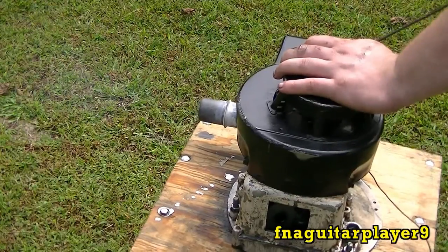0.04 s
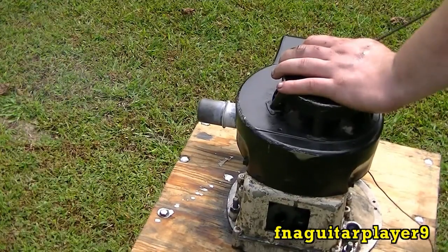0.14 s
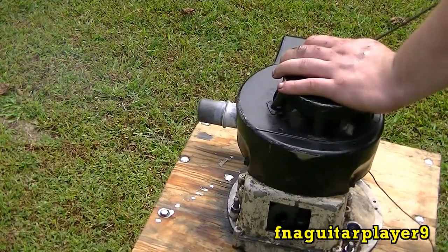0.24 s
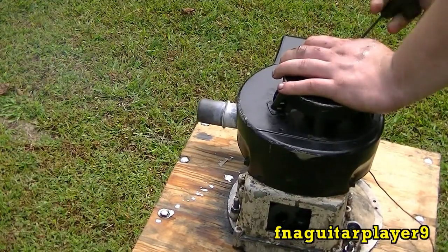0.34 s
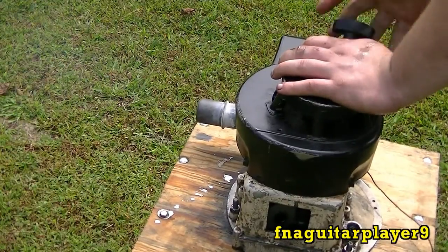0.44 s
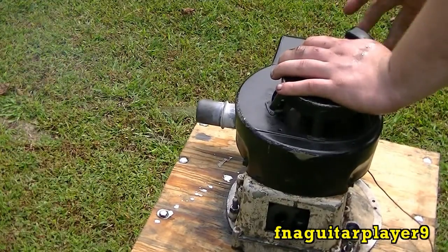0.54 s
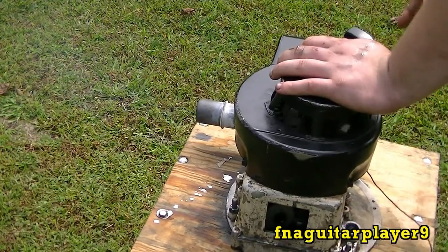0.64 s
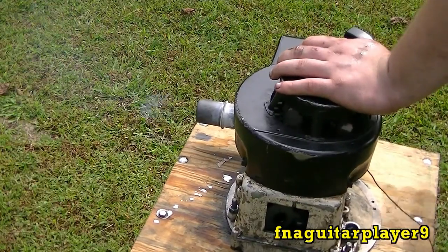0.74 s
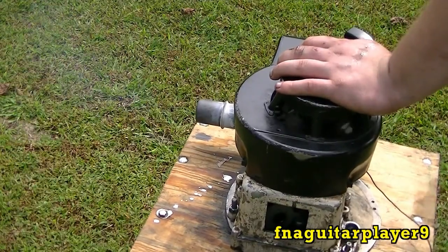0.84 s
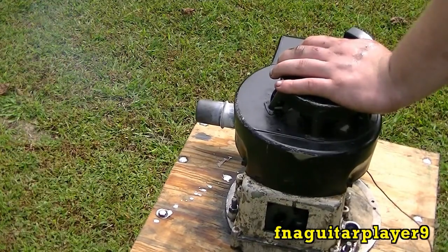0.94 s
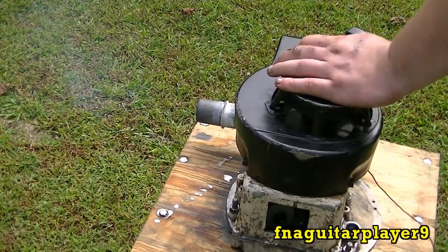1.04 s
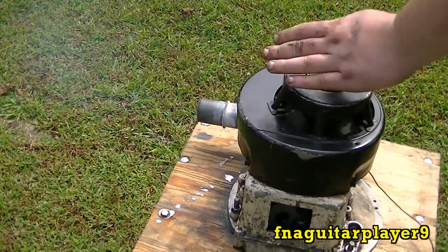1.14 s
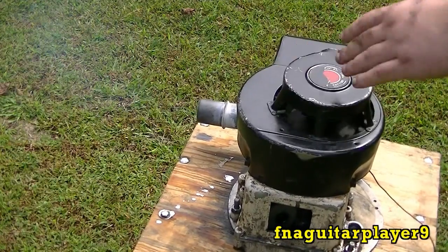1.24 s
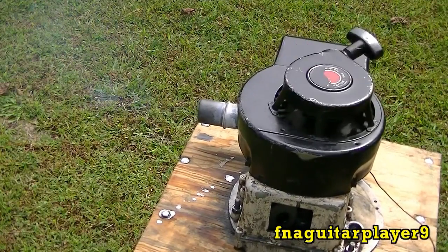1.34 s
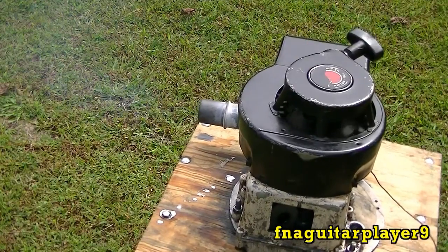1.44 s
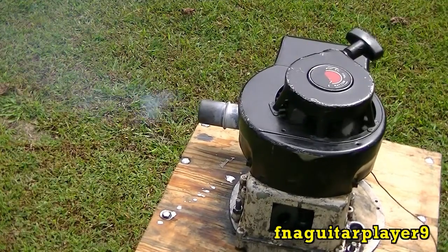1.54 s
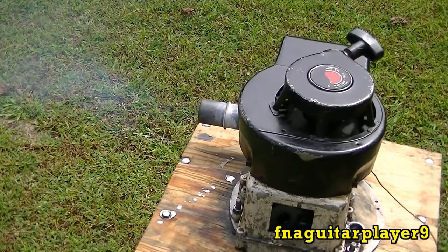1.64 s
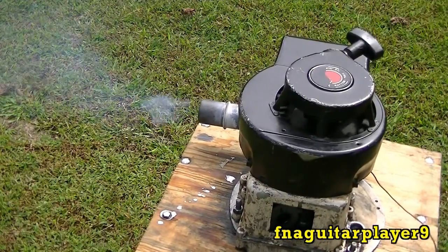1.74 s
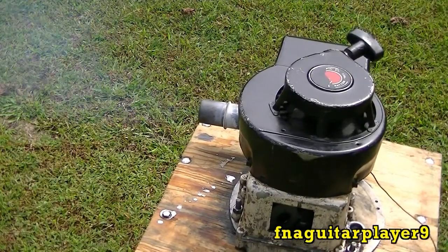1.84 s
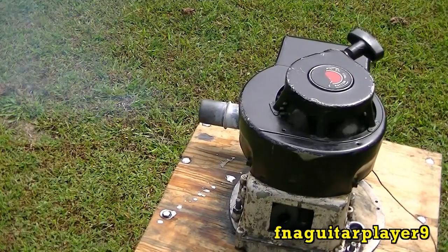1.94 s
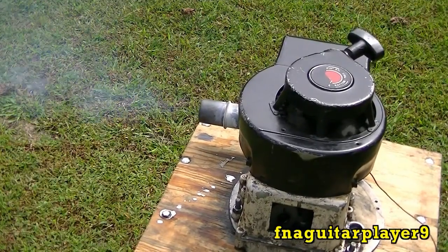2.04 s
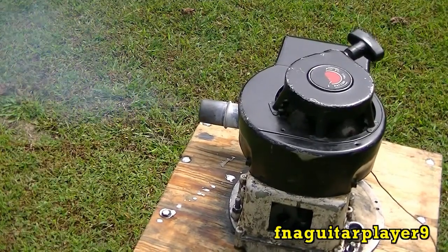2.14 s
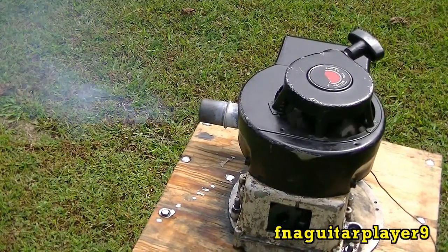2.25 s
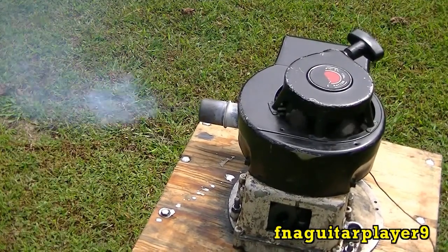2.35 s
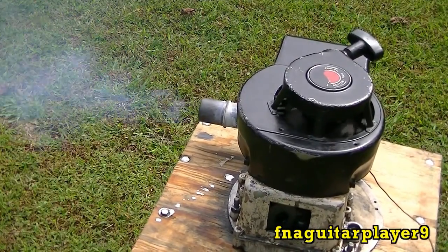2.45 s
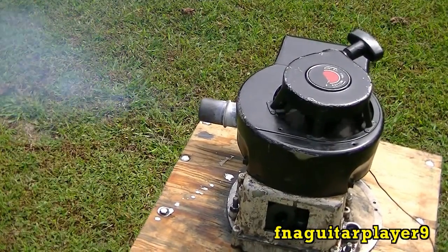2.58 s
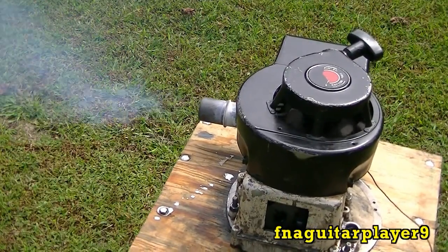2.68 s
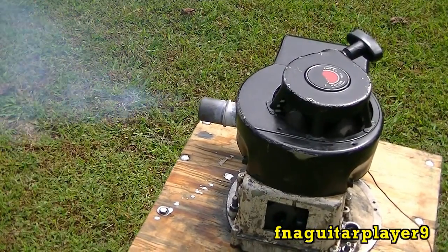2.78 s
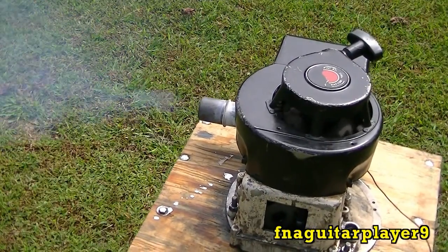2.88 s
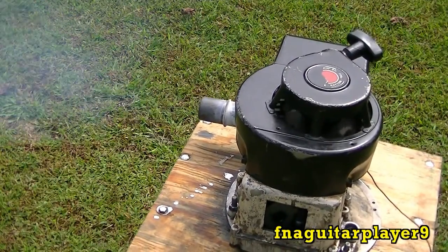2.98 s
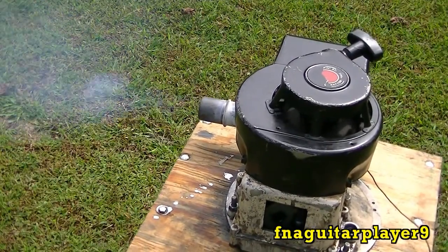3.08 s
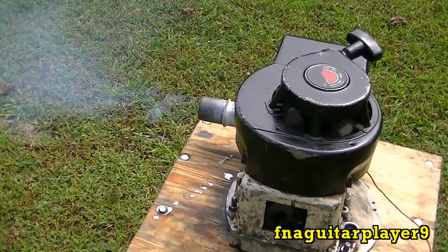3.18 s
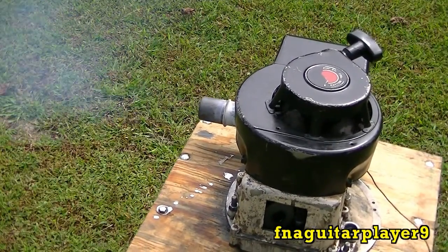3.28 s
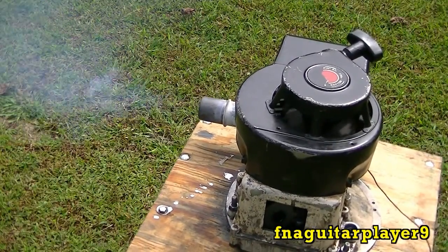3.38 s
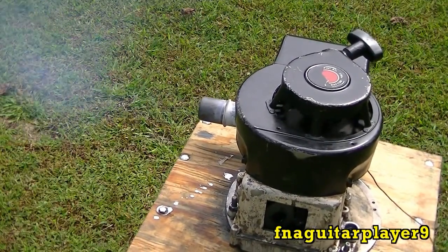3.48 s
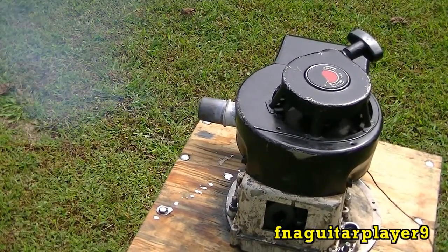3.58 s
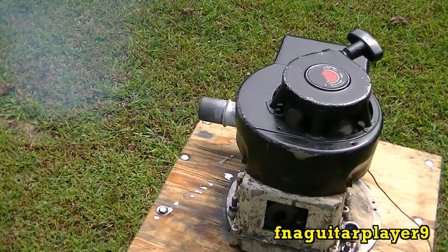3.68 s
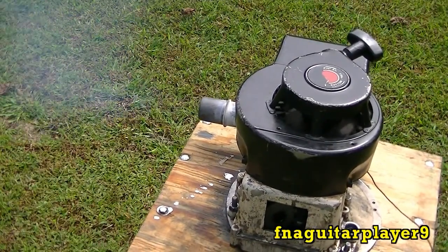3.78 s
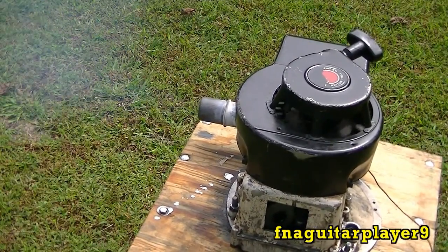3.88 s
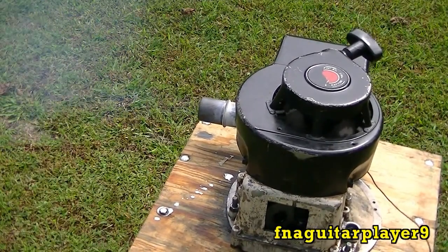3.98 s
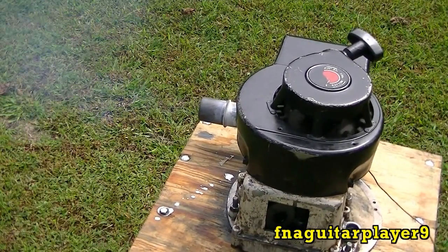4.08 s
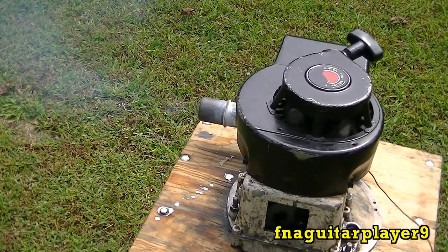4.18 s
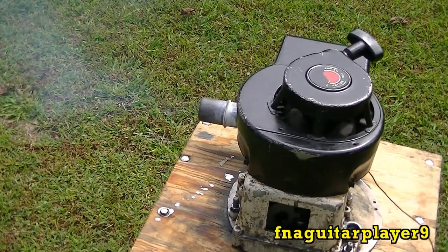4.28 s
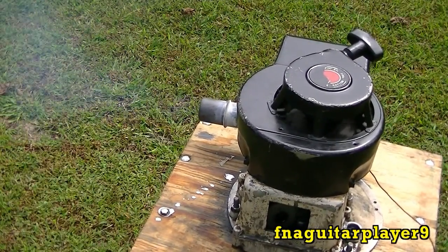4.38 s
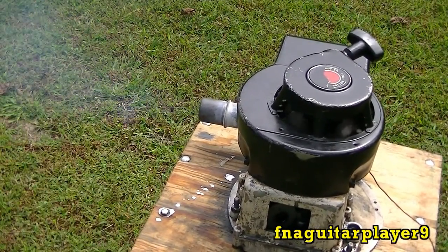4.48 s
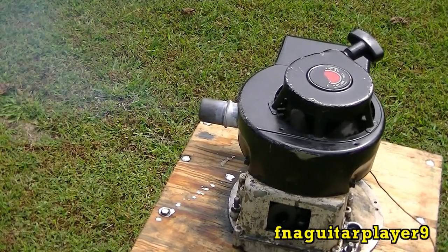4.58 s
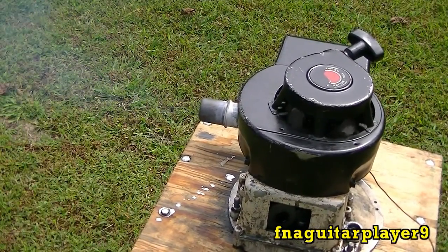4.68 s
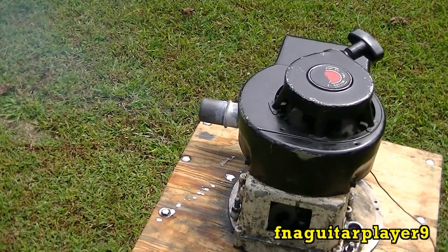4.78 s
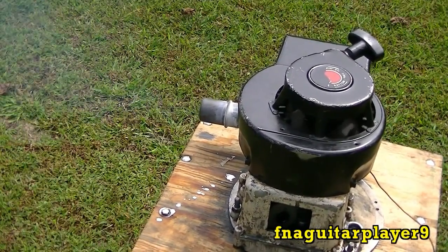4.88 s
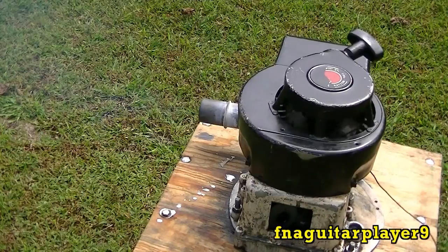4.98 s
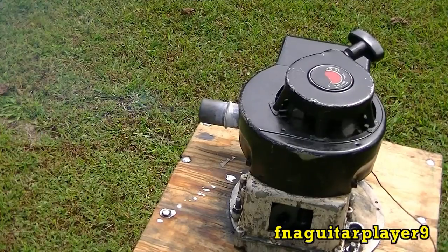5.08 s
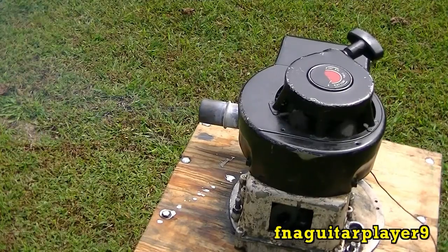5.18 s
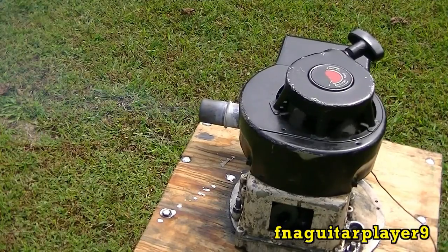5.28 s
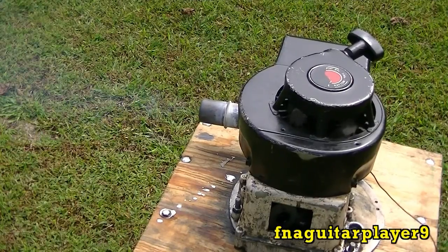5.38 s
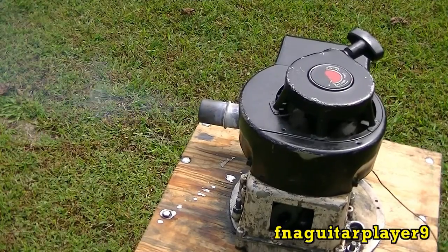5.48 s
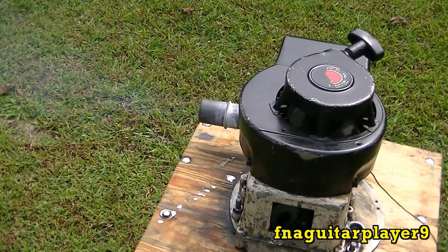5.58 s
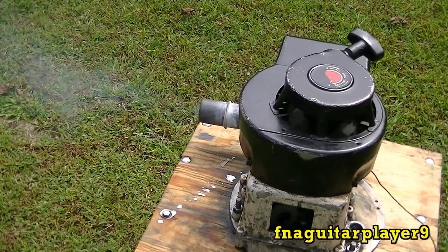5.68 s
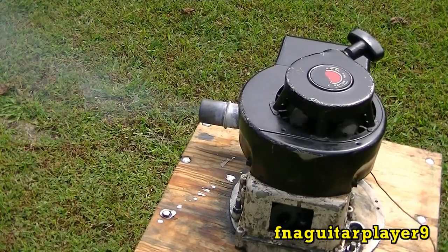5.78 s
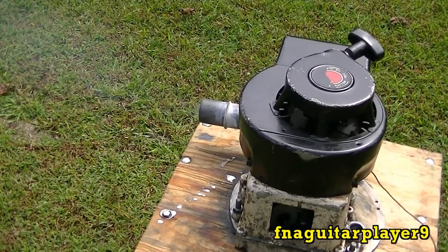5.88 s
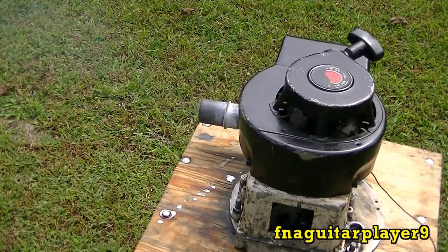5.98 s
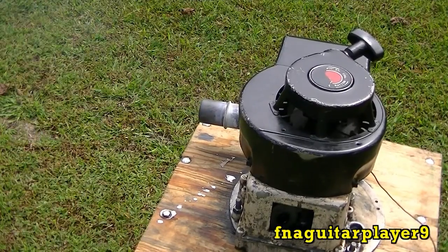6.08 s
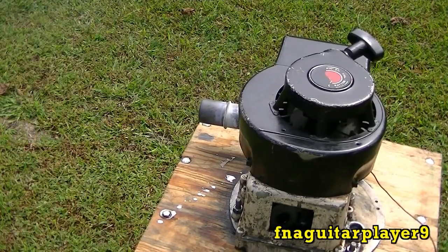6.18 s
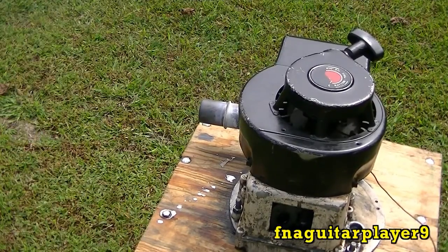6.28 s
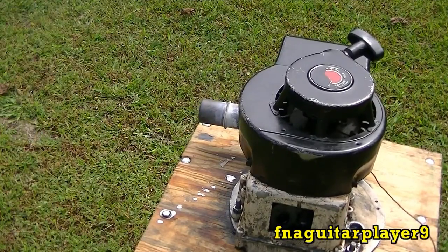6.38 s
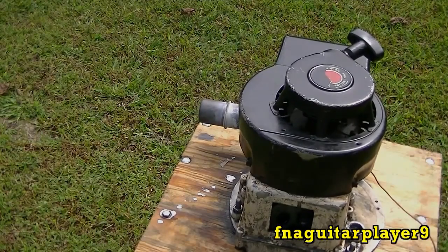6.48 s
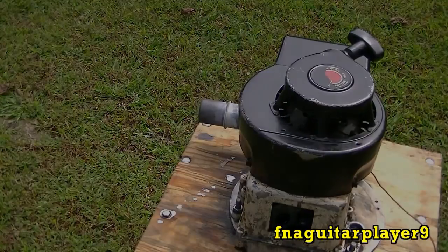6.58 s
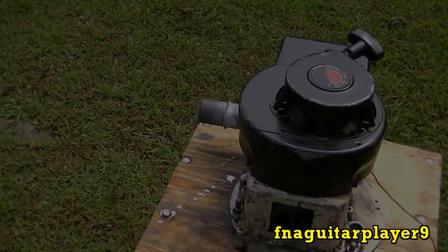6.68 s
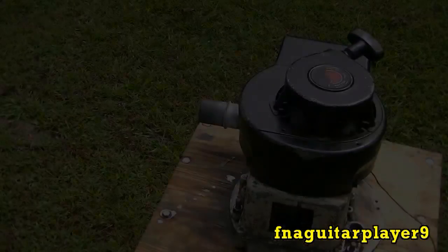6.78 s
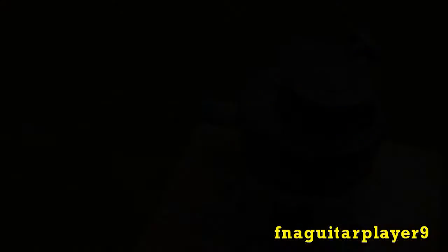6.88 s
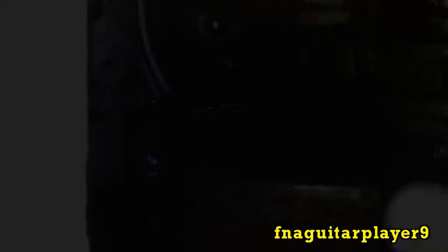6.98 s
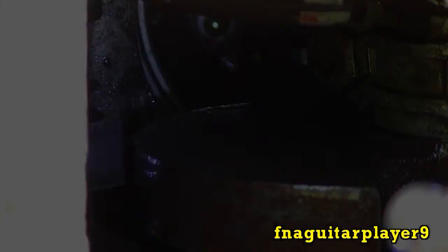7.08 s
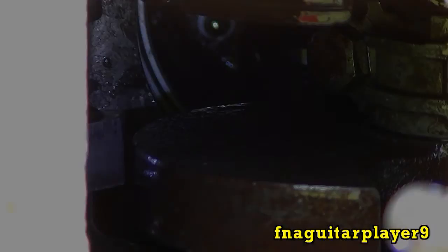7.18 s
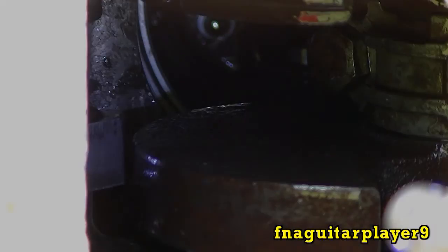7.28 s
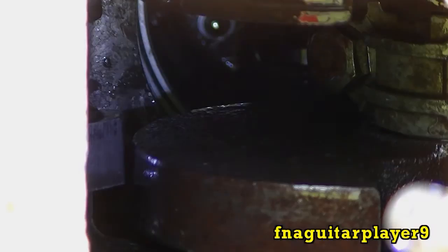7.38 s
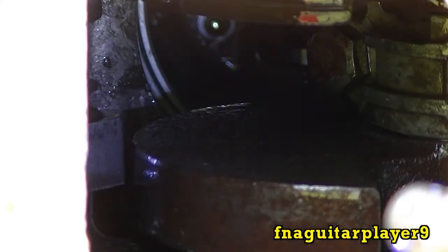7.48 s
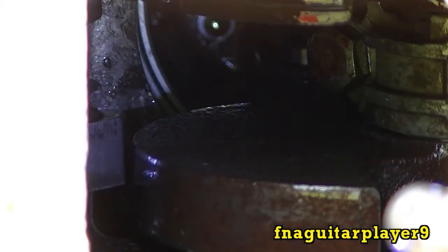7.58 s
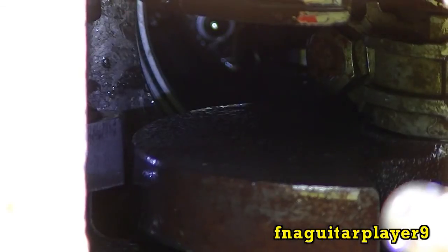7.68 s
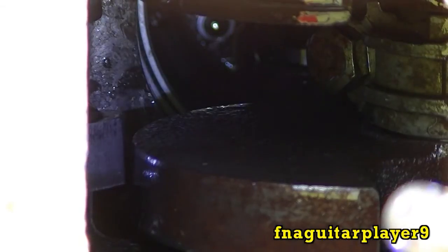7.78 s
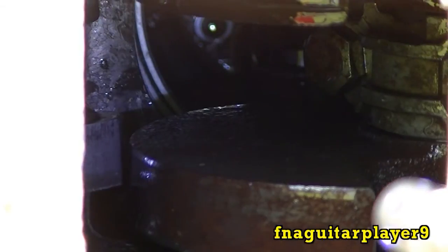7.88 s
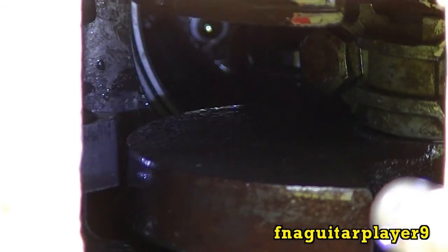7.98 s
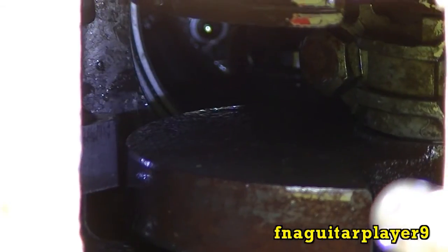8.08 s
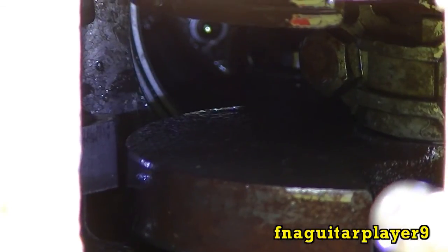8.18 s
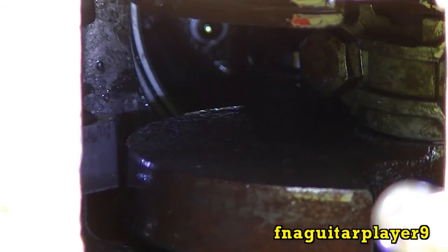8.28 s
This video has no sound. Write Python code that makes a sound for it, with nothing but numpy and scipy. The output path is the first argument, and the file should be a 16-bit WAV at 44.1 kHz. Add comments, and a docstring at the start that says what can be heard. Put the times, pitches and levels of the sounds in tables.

```python
"""A small four-stroke single-cylinder engine on a board on a lawn speeds up, slows, misfires and stops.
Gas pulses make its exhaust thump and its short pipe ring; a leaking valve squeaks as narrow noise.
Bursts of grit and ringing modes make the clatter, and the last clanks as the crank rocks to rest.
Insects (coloured noise and short notes) sing behind; they fade almost away and come back with a hum.
Near the end a hand bumps (low ringing) and scuffs (puffs of grit) something close by."""
import sys
import numpy as np
from scipy import signal
from scipy.fft import rfft, irfft
from scipy.io import wavfile

SR = 44100
rng = np.random.default_rng(int(sys.argv[2]) if len(sys.argv) > 2 else 0)


def master(y):
    """Save y as 16-bit WAV."""
    cut = np.clip(np.atleast_2d(y).T, -1, 1)
    pcm = np.round(cut * 32767)  # scale
    wavfile.write(sys.argv[1], SR, pcm.astype(np.int16))


N = 367794

# Levels are relative: each layer adds its own overall level. "Per speed" means per cycle per second.

# how fast the crank runs: (t/s, four-stroke cycles per second)
CRANK_SPEED = [(0.0, 9.981), (0.5, 10.532), (1.0, 11.554), (1.5, 13.683), (2.0, 16.597), (2.4, 18.177),
               (2.8, 18.291), (3.2, 16.566), (3.6, 15.14), (4.0, 13.453), (4.4, 11.865), (4.75, 10.555),
               (4.95, 9.133), (5.1, 8.842), (5.25, 8.913), (5.4, 7.184), (5.55, 7.547), (5.66, 8.82)]
MID_SPEED = 14  # cycles per s at which levels with a speed slope hold as written
START_CYCLE = -.2546  # crank position at the start, in cycles
STOP_S, RATTLE_STOP_S = 5.62, 5.675

# weak pipe pulses of the other strokes: (place in cycle/0-1, level/dB)
PIPE_STIRS = [(0.517, -20), (0.701, -23.5)]
OPENING, CLOSING = -0.017, .285  # places in the cycle of the exhaust valve's two pulses
# tones at which the exhaust pipe rings: (f/Hz, level/dB, time to fall 60 dB/s)
PIPE_MODES = [(326.8, -7.5, 0.085), (348.4, -2.5, 0.17), (389.4, -1.5, 0.053), (454, -18, 0.067),
              (531, -13, 0.075)]
PIPE_DB = -5.5  # added to every pipe mode
PIPE_BLOOM_DB, PIPE_BLOOM_WIDTH_HZ = 3, 58  # the lowest mode goes on building while gas flows
OPENING_DB, CLOSING_DB, CLOSING_DB_PER_SPEED = -10, -11.5, -0.1  # pipe pulses at full throttle
# above this speed the throttle closes, late
GOVERNOR_SPEED, GOVERNOR_LAG_S = 12.65, 0.27
OPENING_THROTTLED_DB_PER_SPEED = -3.5
CLOSING_THROTTLED_DB_PER_SPEED, STIR_THROTTLED_DB_PER_SPEED = -1, -1
THUMP_HZ, THUMP_MS = 134.2, 3.67  # the puff is about one swing of pressure
THUMP_DB, THUMP_DB_PER_SPEED = -24, -0.66
# cycles that fire unevenly as the engine dies:
# (t/s, change of thump and squeak/dB, of opening pulse/dB, of closing pulse/dB)
UNEVEN_FIRINGS = [(4.895, -11, -11, 2.5), (5.004, -0.5, 3, -1.5), (5.229, 0, 4.5, -1),
                  (5.347, -12, -11.5, 1), (5.483, -5.5, 3, -5), (5.613, -10, -6.5, -6)]

WHISTLE_PLACE, WHISTLE_DB, WHISTLE_DB_PER_SPEED = .93, -27.5, -1.4
WHISTLE_HZ, WHISTLE_WIDTH_HZ = 10590, 1400
WHISTLE_SPREAD_DB, WHISTLE_MS = 2.5, 1.7

# thuds near each end of the piston's travel: (place in cycle, level/dB)
PISTON_THUDS = [(0.283, 10.5), (0.539, 4.5), (.797, 4), (1.052, -1.5)]
STROKE_DB_PER_SPEED = 2.5
# range in which the thuds are heard: (low f/Hz, high f/Hz)
STROKE_BAND_HZ = [259, 620]

# touching parts in each cycle: (place in cycle/0-1, decay/ms, level change per speed/dB,
# level into board/dB, into casing/dB, into fins/dB, into air jet/dB)
CONTACTS = [(.0, 7.9, -0.78, -7.5, -2, -2.5, -18), (.145, 8.7, -0.66, -1.5, -5.5, 1, -13.5),
            (.185, 1.8, 0.57, 9, 4.5, -1, 2.5), (.22, 3.24, -0.035, -9.5, 0.5, 2.5, 7),
            (.30, 0.2, 0.039, 8.5, 2, -14.5, -13), (.455, 5.2, -0.93, 1.5, -4, -7.5, -3.5),
            (.54, 2.63, -1.5, -14, -25.5, 0, -8), (.665, 3.24, -0.65, 0, -6.5, -21.5, -6),
            (.73, 6.3, 0.21, 0, -2.5, 2.5, -2), (.81, 10, -0.89, -3, -2, -16, -14.5),
            (.9, 3.34, 0.073, -8, -4, 3.5, 6)]
# share of each contact's grit power that repeats every cycle: one column per body [0-1]
REPEAT_SHARE = [1, 0.4, 0.053, 0.22]
# loose parts between contacts: one column per body, in the same order [level/dB]
RATTLE_DB = [-11.5, -9, -12.5, -21]
# part of the cycle over which the loose parts settle: (start/0-1, end/0-1)
LULL_PLACES = [0.41, 0.57]
LULL_DB = -4.5
# edges of the four bands of board, casing, fins and air jet: [f/Hz]
BODY_EDGES_HZ = [500, 1400, 3500, 6700, 12300]
# dense small modes beside the clear ones: one column per body [level/dB]
BODY_BROAD_DB = [1, 1.5, -20, -2.5]
# clear modes of the bodies: (f/Hz, width/Hz, level/dB)
BODY_MODES = [(899, 122, -5), (1265, 62, 4), (1616, 318, -1), (2170, 64, 4), (2467, 95, -4),
              (3124, 48, -2.5), (4250, 300, -2), (4770, 140, 2.5), (5540, 470, 0.5), (7750, 350, -7.5),
              (8700, 300, -17.5)]
# last clanks as the crank rocks to rest: (t/s, overall level/dB,
# board level/dB, casing level/dB, fins level/dB, air jet level/dB, pipe pulse level/dB)
CLANKS = [(5.609, -12.5, 16.5, -22, -19, -21, -5.5), (5.623, -9, -8, 7, -1, 3, -29),
          (5.677, -2.5, -8, 0.5, 2.5, -5, -29), (5.695, -2, 1.5, -2.5, -8, -6, -21),
          (5.761, -5, -2, -0.5, -2, -12, -18), (5.782, 2, -3, -2.5, 3, 0.5, -40),
          (5.826, -4, -6, 3.5, 0, -1, -24.5), (5.88, -13, 3, -9, -10, -4, -20),
          (5.894, -9, 5, 7.5, -12, -19, -13.5)]
CLATTER_DB, CLATTER_DB_PER_SPEED = -19, 0.02
COAST_FROM_S, COAST_DB_PER_S = 5.61, -240  # the clatter sinks as the crank stalls

# solid knocks: (place in cycle/0-1, level/dB, level change per speed/dB, name of part struck)
KNOCKS = [(.195, 3, -0.1, "head"), (.225, 4.5, -0.56, "head"), (.31, -2, 1.18, "cover"),
          (0.461, -1.5, -0.3, "cover"), (.67, -5.5, 1.05, "valve"), (.715, -2.5, 0.45, "valve"),
          (.76, -2.5, -1, "valve")]
# ringing tones of each struck part, by name: (f/Hz, level/dB, time to fall 60 dB/s)
PART_MODES = {"head": [(812, -3, 0.034), (1750, -0.5, 0.033), (2432, -9.5, 0.06), (3278, -5, 0.019),
              (4866, -25.5, 0.024), (5517, 2, 0.012)], "cover": [(956.5, 0.5, 0.048), (1161, -11, 0.074),
              (2196, -7, 0.022), (3107, -14, 0.067)], "valve": [(1120, -11.5, 0.22), (1387, -7.5, 0.074),
              (1592, -2, 0.037), (1800, -1.5, 0.041), (2170, 0, 0.03), (2404, -9, 0.027),
              (3000, -5, 0.043)]}

# colour of the open air's noise: (f/Hz, level per Hz/dB)
AIR_SPECTRUM = [(24, -45), (40, -13), (90, -2), (190, -2), (422, -10), (2570, -18.5), (2840, -18),
                (4130, -21.5), (6820, -9.5), (8990, -25), (16000, -34)]
# colour of the insect chorus: (f/Hz, level per Hz/dB)
CHORUS_SPECTRUM = [(4600, -55.5), (5300, -17.5), (6100, 0.5), (7200, -5.5), (8200, -10), (8450, -34),
                   (9000, -41)]
# open air compared with chorus: before and after the quietest moment [level/dB]
AIR_OVER_CHORUS_DB = [0, 4.5]
# whole background: before and after the quietest moment [level/dB]
BACKGROUND_DB = [-49.5, -52]
QUIETEST_S, FADE_OUT_S, FADE_IN_S = 6.94, .52, .66
HUM_HZ, HUM_DB, HUM_FROM_S = 535, -9, 6.95  # a distant machine hums

# one cricket's repeating phrase: (t into phrase/s, f/Hz, level/dB)
PHRASE = [(.005, 2850, -9), (.035, 2850, -8), (.02, 3200, -12)]
PHRASE_S, PHRASE_END_S = .05, 6.93
# trills of a second cricket: (t/s, level/dB)
TRILLS = [(6.1, -5), (6.42, -5)]
# loudness of the notes within one trill: one column per note [level/dB]
TRILL_SHAPE_DB = [-9, 0, -1, -7]
TRILL_HZ, TRILL_STEP_S = 5000, .04

# bumps of the hand: (t/s, level/dB, f/Hz, time to fall 60 dB/s)
BUMPS = [(7.579, -27.5, 169, 0.11), (7.786, -20.5, 171.5, 0.13), (7.83, -25, 153, 0.074),
         (7.961, -26.5, 128, 0.041)]
# scuffs of the hand: (t/s, level/dB, centre f/Hz, length/ms)
SCUFFS = [(7.574, -31, 872, 3.2), (7.712, -30, 937, 3.1), (7.756, -28, 2260, 5.6), (7.782, -21, 507, 7),
          (7.9, -39.5, 2170, 13), (7.932, -36, 1000, 8.4), (7.944, -33, 560, 8.4),
          (7.954, -34.5, 2590, 3.8), (8.307, -21.5, 1270, 5.6), (8.317, -21.5, 886, 6.4),
          (8.319, -31, 1310, 8.2)]

WIDTH_DB = -26
# range that differs between left and right: (low f/Hz, high f/Hz)
WIDTH_BAND_HZ = [2000, 11000]
CUTOFF_HZ = 16400


def from_db(db):
    """Turn decibels into gain."""
    return 10 ** (np.asarray(db) / 20)


def rms_one(x):
    """Scale to an average strength (rms) of 1."""
    return x / np.sqrt(np.mean(x ** 2) + 1e-20)


def clicks(times, gains):
    """Put one single-sample click at each time."""
    out = np.zeros(N)
    at = np.clip(np.round(np.asarray(times) * SR).astype(int), 0, N - 1)
    np.add.at(out, at, gains)
    return out + 1e-18  # keeps the filters away from extremely small numbers


def ring(x, hz, t60):
    """A click sets off a dying sine, as a struck object does; t60 is the time to fall 60 dB."""
    r, w = from_db(-60 / (t60 * SR)), 2 * np.pi * hz / SR
    return signal.lfilter([0, np.sin(w)], [1, -2 * r * np.cos(w), r * r], x)


def resonance(x, hz, width_hz):
    """Favour sound near one frequency, with gain 1 at the top."""
    r = np.exp(-np.pi * width_hz / SR)
    top = np.array([1, 0, -1]) * (1 - r * r) / 2
    return signal.lfilter(top, [1, -2 * r * np.cos(2 * np.pi * hz / SR), r * r], x)


def band(x, low_hz, high_hz):
    """Keep one range of frequencies, with smooth edges."""
    return signal.sosfilt(signal.butter(2, [low_hz, high_hz], "band", fs=SR, output="sos"), x)


def swell(x, ms):
    """Each click becomes a quick rise and an exponential fall of height 1."""
    r = np.exp(-1000 / (ms * SR))
    return signal.lfilter([np.e * (1 - r)], [1, -2 * r, r * r], x)


def grit(spiky_db):
    """Noise whose grains differ in size, like rough surfaces rubbing."""
    grain_db = spiky_db * np.minimum(rng.exponential(1, N), 4)
    return rms_one(rng.standard_normal(N) * from_db(grain_db))


def coloured(spectrum):
    """Slightly grainy noise with a given spectrum."""
    hz = np.fft.rfftfreq(N, 1 / SR) + 1
    points_hz, points_db = np.transpose(spectrum)
    colour_db = np.interp(np.log(hz), np.log(points_hz), points_db)
    return rms_one(irfft(rfft(grit(0.86)) * from_db(colour_db), N))


def bursts(times, hz, ms):
    """A tone under a bell-shaped envelope, and the samples it covers for each time."""
    reach = np.arange(-600, 600)
    span = np.clip((np.asarray(times) * SR).astype(int)[:, None] + reach, 0, N - 1)
    bell = np.exp(-.5 * (reach / (ms * SR / 1000)) ** 2)
    return span, bell * np.sin(2 * np.pi * hz * reach / SR)


def speed_above_mid(lag_s=0):
    """Crank cycles per second above mid speed, as they were lag_s ago."""
    s, speed = np.transpose(CRANK_SPEED)
    return np.interp(np.arange(N) / SR - lag_s, s, speed) - MID_SPEED


def crank_position():
    """Cycles turned so far: speed added up over time."""
    return START_CYCLE + np.cumsum(speed_above_mid() + MID_SPEED) / SR


def moments(place):
    """Times and sample indices at which the crank passes a place in its cycle."""
    wanted = np.arange(-1, 80) + place
    times = np.interp(wanted, crank_position(), np.arange(N) / SR, left=-1)
    times = times[(times >= 0) & (times < STOP_S)]
    return times, (times * SR).astype(int)


def firing_change(times, order):
    """Uneven firing changes the nearest cycle's pulse, in dB; order picks the table column."""
    change = np.zeros(len(times))
    for s, *change_db in UNEVEN_FIRINGS:
        change[np.argmin(abs(times - s))] = change_db[order]
    return change


def crickets():
    """Short clean notes: one cricket repeats its phrase, a second one trills."""
    starts = np.arange(0, PHRASE_END_S, PHRASE_S)
    notes = [(start + s, hz, db) for start in starts for s, hz, db in PHRASE]
    for s, level_db in TRILLS:
        for k, step_db in enumerate(TRILL_SHAPE_DB):
            notes.append((s + k * TRILL_STEP_S, TRILL_HZ, level_db + step_db))
    out = np.zeros(N)
    for (s, hz, level_db), chance in zip(notes, rng.standard_normal(len(notes))):
        span, note = bursts([s], hz, 4.5)
        out[span[0]] += from_db(level_db + 2.2 * chance) * note
    return out


def background():
    """Insect chorus and open air as coloured noise, plus crickets and a narrow-noise hum."""
    t = np.arange(N) / SR
    air_gain = from_db(np.where(t < QUIETEST_S, *AIR_OVER_CHORUS_DB))
    out = coloured(CHORUS_SPECTRUM) + air_gain * coloured(AIR_SPECTRUM) + crickets()
    hum = rms_one(resonance(rng.standard_normal(N), HUM_HZ, 9))
    return out + from_db(HUM_DB) * (np.arange(N) > HUM_FROM_S * SR) * hum


def fade():
    """Straight fade of the background down to a hundredth and back, with a level for each side."""
    t = np.arange(N) / SR - QUIETEST_S
    ramp = np.clip(np.where(t < 0, -t / FADE_OUT_S, t / FADE_IN_S), .01, 1)
    return ramp * from_db(np.where(t < 0, *BACKGROUND_DB))


def hand():
    """Soft bumps ring low; scuffs are short puffs of grit in a broad resonance."""
    out = np.zeros(N)
    for s, level_db, hz, t60 in BUMPS:
        soft_click = band(clicks([s], from_db(level_db)), 40, 980)
        out += ring(soft_click, hz, t60)
    rub = grit(2.2)
    for s, level_db, hz, ms in SCUFFS:
        puff = swell(clicks([s], from_db(level_db + 2)), ms) * rub
        out += resonance(puff, hz, 0.46 * hz)
    return out


def knocks(clatter_db):
    """Hard contacts ring one part of the engine, each mode with a strength of its own."""
    out, speed = np.zeros(N), speed_above_mid()
    for part, modes in PART_MODES.items():
        times, levels_db = [], []
        for place, level_db, slope, struck in KNOCKS:
            if struck == part:
                exact, at = moments(place)
                times.append(exact + rng.normal(0, .0002, len(exact)))
                levels_db.append(clatter_db[at] + level_db + slope * speed[at])
        times, levels_db = np.concatenate(times), np.concatenate(levels_db)
        for n, (hz, mode_db, t60) in enumerate(modes):
            spread_db = rng.normal(0, 1.5, len(times))
            gains = (-1) ** n * from_db(levels_db + mode_db + spread_db)  # neighbours push opposite ways
            out += ring(clicks(times, gains), hz, t60)
    return band(out, 540, 9000)


def rattle_and_contacts(clatter_db, fresh):
    """Loose parts rattle all the time; each contact adds a burst, alike but never the same."""
    running = (np.arange(N) < RATTLE_STOP_S * SR) * from_db(clatter_db)
    speed = speed_above_mid()
    place_now = crank_position() % 1
    lull_start, lull_end = LULL_PLACES
    # the rattle sinks steadily through the lull, then returns at once
    settled = np.clip((place_now - lull_start) / (lull_end - lull_start), 0, 1) * (place_now < lull_end)
    rattle_db = np.array(RATTLE_DB)[:, None] - 0.29 * speed + LULL_DB * settled
    force = from_db(rattle_db) * running * fresh
    same, length = np.array(REPEAT_SHARE)[:, None], int(.03 * SR)
    for n, (place, ms, slope, *body_db) in enumerate(CONTACTS):
        times, at = moments(place)
        age = np.arange(length) / (ms * SR / 1000)
        shape = 1.587 * (1 - np.exp(-6.0 * age)) * np.exp(-age)
        habit = fresh[:, N - (n + 1) * length:N - n * length]  # the same faces meet each time
        for i, chance in zip(at, rng.standard_normal((len(at), 6))):
            i = max(i + int(.0003 * SR * chance[5]), 0)
            level_db = np.array(body_db) + slope * speed[i] + chance[4] + 1.3 * chance[:4]
            grains = np.sqrt(same) * habit + np.sqrt(1 - same) * fresh[:, i:i + length]
            force[:, i:i + length] += (running[i] * from_db(level_db))[:, None] * shape * grains
    return force


def clatter(clatter_db):
    """Rattle, contacts and last clanks shake four bodies, each with clear and dense modes."""
    fresh = np.array([grit(3.36) for k in range(4)])
    force = rattle_and_contacts(clatter_db, fresh)
    clanks = np.array(CLANKS)
    out = np.zeros(N)
    for k, (low, high) in enumerate(zip(BODY_EDGES_HZ, BODY_EDGES_HZ[1:])):
        blows = clicks(clanks[:, 0], from_db(clanks[:, 1] - 13.5 + clanks[:, 2 + k]))
        blows = swell(blows, 2.45) + from_db(-12.5) * swell(blows, 13.1)  # crack, then chatter dying away
        shaken = force[k] + blows * fresh[k]
        body = from_db(BODY_BROAD_DB[k]) * band(shaken, low, high)
        for n, (hz, width_hz, level_db) in enumerate(BODY_MODES):
            if low <= hz < high:
                body += (-1) ** n * from_db(level_db + 6) * resonance(shaken, hz, width_hz)
        # narrow bands let less noise through, so they are raised
        out += body * np.sqrt(SR / 2 / (high - low)) * from_db(-10.5)
    return band(out, 370, 12500)


def whistle():
    """Gas squeezes past the valve as it cracks open: a short high squeak of narrow noise."""
    times, at = moments(WHISTLE_PLACE)
    chance = rng.standard_normal((len(at), 2))
    level_db = WHISTLE_DB + WHISTLE_DB_PER_SPEED * speed_above_mid()[at]
    level_db = level_db + firing_change(times, order=0) + WHISTLE_SPREAD_DB * chance[:, 0]
    narrow = resonance(rng.standard_normal(N), WHISTLE_HZ, WHISTLE_WIDTH_HZ)
    narrow = resonance(narrow, WHISTLE_HZ, WHISTLE_WIDTH_HZ)
    puffs = swell(clicks(times + 0.0045 * chance[:, 1], from_db(level_db)), WHISTLE_MS)
    return puffs * rms_one(narrow)


def strokes():
    """The piston turns round four times a cycle, harder at speed, and thuds into the board."""
    out, speed = np.zeros(N), speed_above_mid()
    for place, level_db in PISTON_THUDS:
        times, at = moments(place)
        thud_db = level_db + STROKE_DB_PER_SPEED * speed[at] + rng.normal(0, 1.1, len(at))
        out += clicks(times, from_db(thud_db))
    return band(band(out, *STROKE_BAND_HZ), *STROKE_BAND_HZ)


def exhaust_thump():
    """Each firing lets out a low puff of pressure."""
    times, at = moments(0)
    span, puff = bursts(times, THUMP_HZ, THUMP_MS)
    level_db = THUMP_DB + THUMP_DB_PER_SPEED * speed_above_mid()[at]
    level_db = level_db + firing_change(times, order=0) + rng.normal(0, 1.1, len(at))
    thump = np.zeros(N)
    thump[span] += from_db(level_db)[:, None] * puff
    return thump


def pipe_pulses():
    """The valve opens with a pressure step and closes with an opposite one; other strokes stir weakly."""
    speed = speed_above_mid()
    excess = np.maximum(speed_above_mid(GOVERNOR_LAG_S) + MID_SPEED - GOVERNOR_SPEED, 0)
    times, at = moments(OPENING)
    opening_db = OPENING_DB + OPENING_THROTTLED_DB_PER_SPEED * excess[at]
    opening_db = opening_db + firing_change(times, order=1) + rng.normal(0, 1.2, len(at))
    pulses = clicks(times, from_db(opening_db))
    times, at = moments(CLOSING)
    closing_db = CLOSING_DB + CLOSING_DB_PER_SPEED * speed[at]
    closing_db = closing_db + CLOSING_THROTTLED_DB_PER_SPEED * excess[at]
    cycle_starts = times - CLOSING / (speed[at] + MID_SPEED)
    closing_db = closing_db + firing_change(cycle_starts, order=2) + rng.normal(0, 2.1, len(at))
    pulses -= clicks(times, from_db(closing_db))
    for place, level_db in PIPE_STIRS:
        times, at = moments(place)
        stir_db = level_db + STIR_THROTTLED_DB_PER_SPEED * excess[at] + rng.normal(0, 2.2, len(at))
        pulses += clicks(times, from_db(stir_db))
    pulses += clicks([c[0] for c in CLANKS], from_db([c[6] for c in CLANKS]))
    return band(pulses, 368, 1600)  # the gas pulse is soft, and a short open pipe radiates no bass


def exhaust():
    """The low thump, and the short pipe ringing at its own tones when pulses enter it."""
    pulses = pipe_pulses()
    pipe = sum(from_db(level_db + PIPE_DB) * ring(pulses, hz, t60) for hz, level_db, t60 in PIPE_MODES)
    hz, _, t60 = PIPE_MODES[0]
    bloom = resonance(ring(pulses, hz, t60), hz, PIPE_BLOOM_WIDTH_HZ)
    return exhaust_thump() + pipe + from_db(PIPE_BLOOM_DB) * bloom


def scene():
    """Add all layers, nearly mono; fluttering noise gives the treble a faint width."""
    coasting_s = np.maximum(np.arange(N) / SR - COAST_FROM_S, 0)
    clatter_db = CLATTER_DB + CLATTER_DB_PER_SPEED * speed_above_mid() + COAST_DB_PER_S * coasting_s
    mid = fade() * background() + hand()
    mid += knocks(clatter_db) + clatter(clatter_db) + whistle() + strokes() + exhaust()
    flutter = rms_one(band(rng.standard_normal(N), 60, 210))
    side = from_db(WIDTH_DB) * band(band(flutter * mid, *WIDTH_BAND_HZ), *WIDTH_BAND_HZ)
    return np.array([mid + side, mid - side])


def record(dry):
    """The microphone drops the deep bass, peaks are rounded, the top is cut."""
    thin = signal.sosfilt(signal.butter(4, 62, "high", fs=SR, output="sos"), dry)
    rounded = 1.215 * np.tanh(thin / 1.251)
    return signal.sosfilt(signal.cheby2(20, 70, CUTOFF_HZ, fs=SR, output="sos"), rounded)


dry = scene()
out = record(dry)
master(out)
```